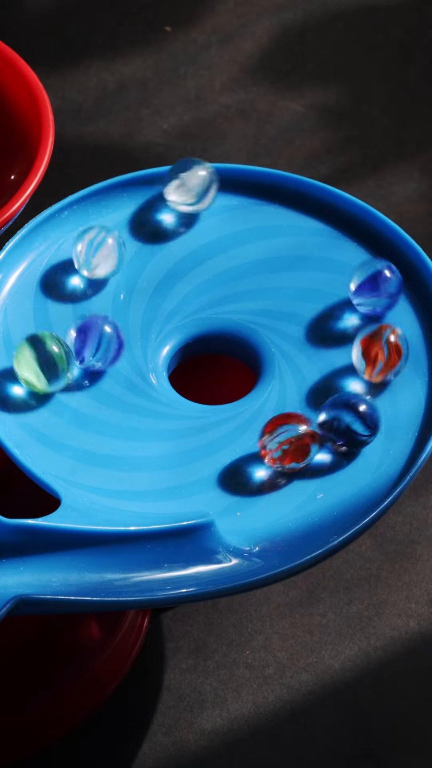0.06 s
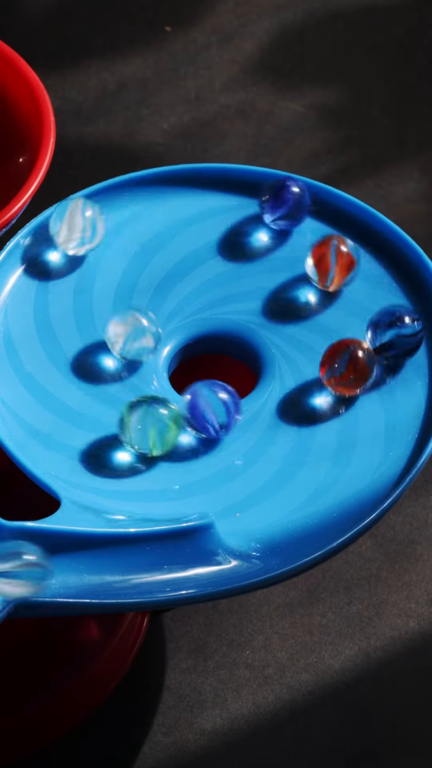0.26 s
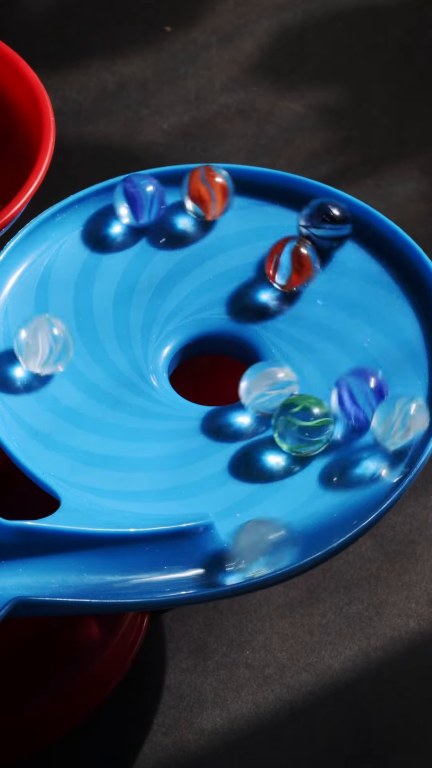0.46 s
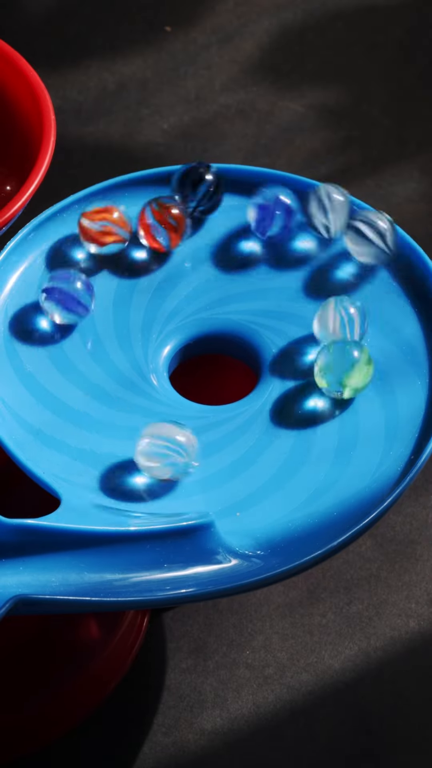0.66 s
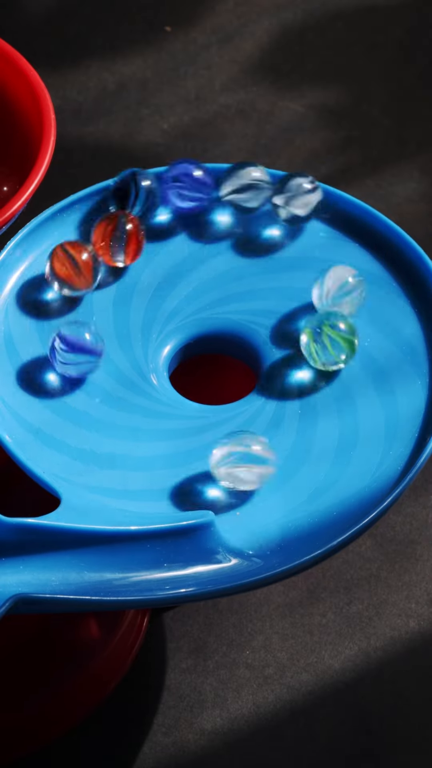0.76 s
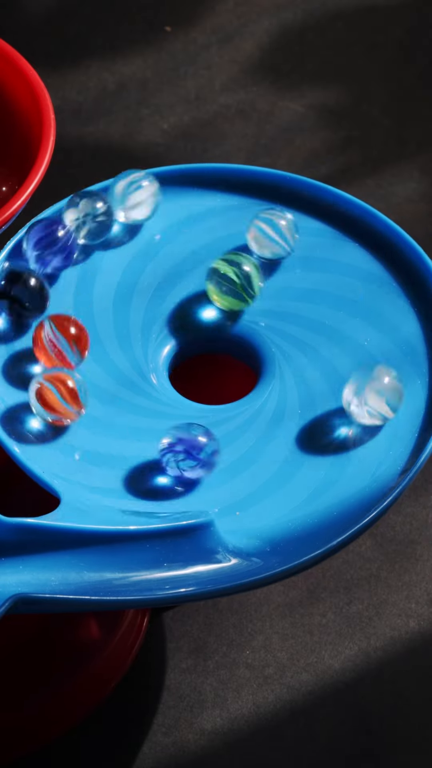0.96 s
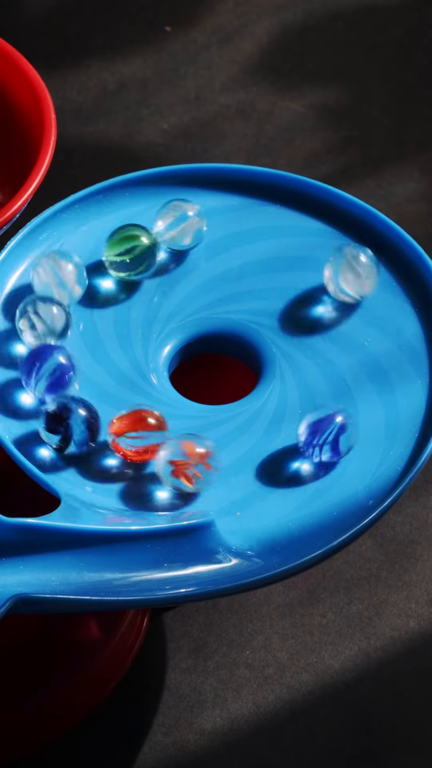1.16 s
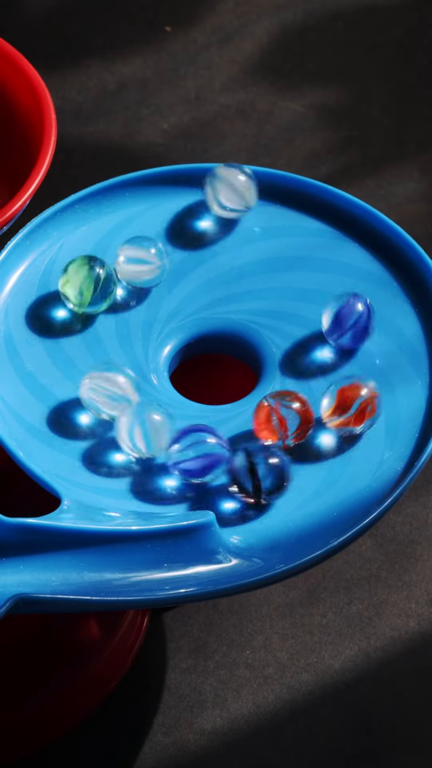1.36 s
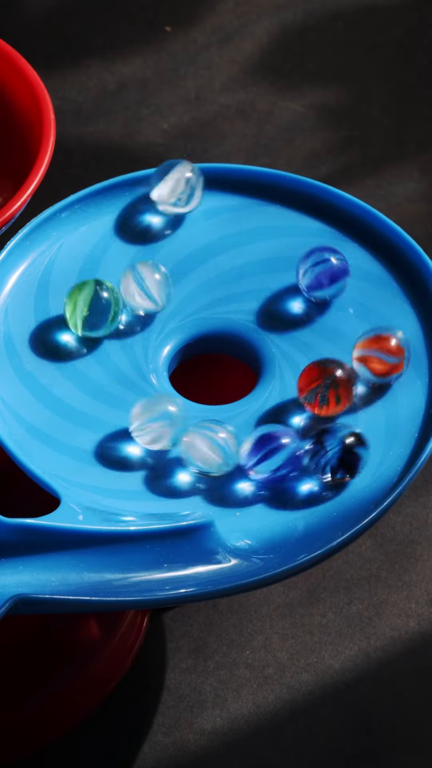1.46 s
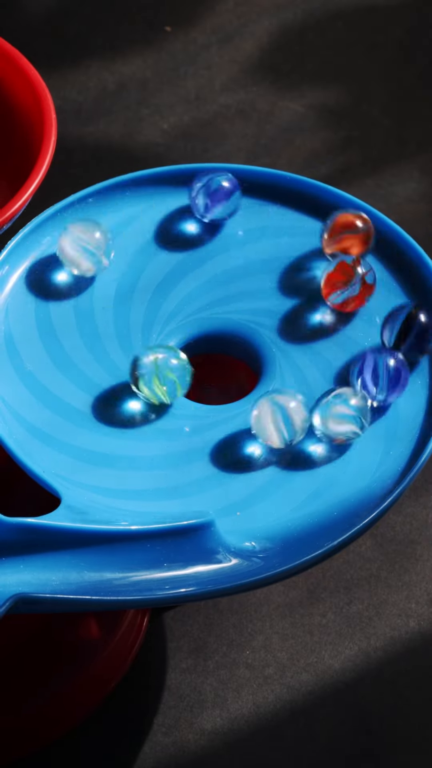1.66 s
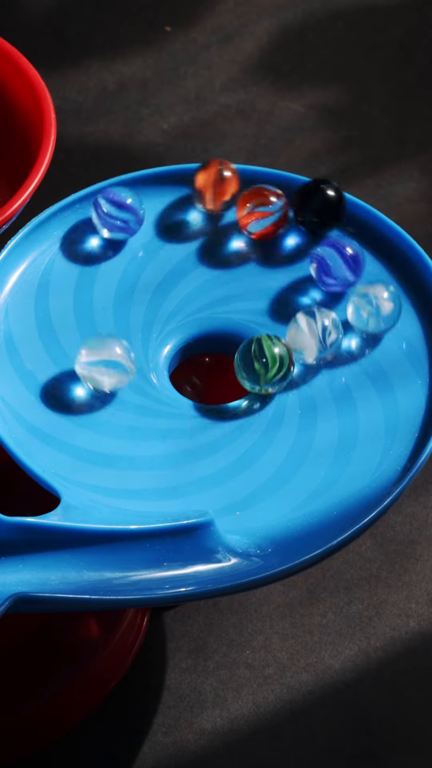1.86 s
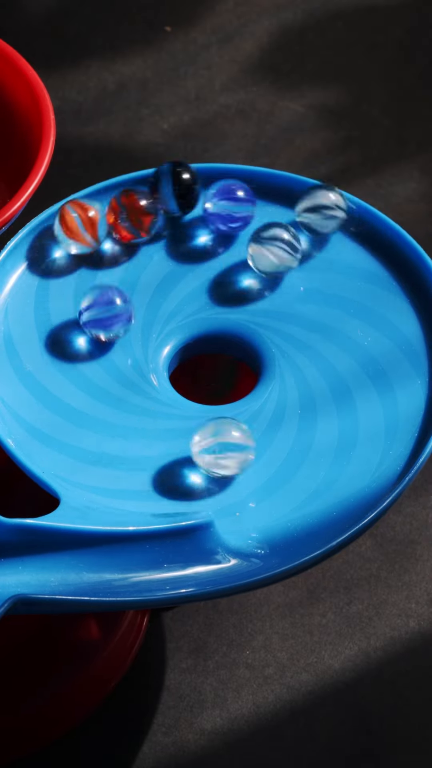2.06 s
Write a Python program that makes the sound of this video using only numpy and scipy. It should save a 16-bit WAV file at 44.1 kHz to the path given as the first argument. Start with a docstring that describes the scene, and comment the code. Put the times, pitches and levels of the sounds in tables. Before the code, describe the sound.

Glass marbles roll around a plastic funnel with a soft rumble, clicks and knocks.

```python
"""Glass marbles rumble, knock and click as a dozen of them circle in a plastic funnel, close by.
Tiny bumps under the rolling marbles shake the shell. Now and then one knocks on the plastic,
two click together, or one drops against the narrow neck with a hollow clack.
A hard surface nearby returns each hit a few milliseconds later, in a small, dry room."""
import sys
import numpy as np
from scipy import signal
from scipy.fft import rfft, irfft, next_fast_len
from scipy.io import wavfile
from scipy.ndimage import map_coordinates

SR = 44100
rng = np.random.default_rng(int(sys.argv[2]) if len(sys.argv) > 2 else 0)


def store_wav(level_fs):
    """Save 16-bit WAV to argv[1]."""
    pcm = np.round(np.clip(np.atleast_2d(level_fs), -1, 1) * 32767)
    wavfile.write(sys.argv[1], SR, pcm.T.astype(np.int16))


N = 92610


def amp(db):
    """Turns decibels into a number to multiply by."""
    return 10 ** (np.asarray(db) / 20)


def unit(x):
    """Scales a sound to an average (rms) level of 1."""
    return x / np.sqrt(np.mean(x ** 2) + 1e-20)


def along(points, hz):
    """Reads between (Hz, value) points, with octaves evenly spaced."""
    freqs, values = np.transpose(points)
    return np.interp(np.log(hz + 1), np.log(freqs + 1), values)


def over_time(points):
    """Joins (seconds, value) points into one value per sample."""
    return np.interp(np.arange(N) / SR, *np.transpose(points))


def filtered(x, response):
    """Multiplies each frequency in x by response(hz)."""
    size = next_fast_len(N + SR // 2)
    return irfft(rfft(x, size) * response(np.fft.rfftfreq(size, 1 / SR)), size)[:N]


def coloured(x, points):
    """Gives x the tone colour of (Hz, dB) points, using a pulse that peaks at 1."""
    size = 4096
    cepstrum = irfft(np.log(amp(along(points, np.fft.rfftfreq(size, 1 / SR)))))
    cepstrum[1:size // 2] *= 2  # folded forward, so nothing sounds before a hit
    cepstrum[size // 2 + 1:] = 0
    pulse = irfft(np.exp(rfft(cepstrum)))
    return signal.fftconvolve(x, pulse / np.abs(pulse).max())[:N]


def softened(x, hz):
    """Turns down the treble above hz: the softer the contact, the duller."""
    return signal.lfilter(*signal.butter(2, min(hz, .45 * SR), fs=SR), x)


def add(track, start_s, sound):
    """Mixes a sound into the track at start_s."""
    part = track[max(0, round(start_s * SR)):][:len(sound)]
    part += sound[:len(part)]


def contact(fade_s, tail_db):
    """A sharp pulse, then a dense shudder that dies away by 60 dB in fade_s."""
    t = np.arange(SR // 20) / SR
    rise = 1 - np.exp(-t / .0002)
    tail = rng.standard_normal(len(t)) * amp(-60 * t / fade_s) * rise
    return (t == 0) + amp(tail_db) * tail / np.linalg.norm(tail)


def ringing(x, tones):
    """x sets tones ringing; neighbouring tones swing in opposite directions."""
    def response(hz):
        return sum((-1) ** k * amp(db) * 1j * hz * width / (pitch ** 2 - hz ** 2 + 1j * hz * width)
                   for k, (pitch, width, db) in enumerate(tones))
    return filtered(x, response)


def hush():
    """The quiet, steady noise of the room."""
    # Each row: frequency in Hz, relative level in dB.
    colour = [(25, -22), (55, -17), (80, 2), (105, -12), (150, -1.5), (300, 0), (1000, 6), (6000, -29.5),
              (12000, -30), (16000, -45.5)]
    return amp(-79) * unit(coloured(rng.standard_normal(N), colour))


def room(x):
    """The room's short wash of echoes, a little different as the marbles move."""
    # Each row: frequency in Hz, seconds to fade by 60 dB.
    fade_times = [(200, 0.64), (1000, 0.19), (2800, 0.079), (7500, 0.11), (15000, 0.088)]
    wash, block = np.zeros(N), 4096
    for start in range(0, N, block):
        hz, t, noise = signal.stft(rng.standard_normal(SR // 3), SR, nperseg=256)
        fade = amp(-60 * t / along(fade_times, hz)[:, None])
        tail = signal.istft(noise * fade, SR, nperseg=256)[1]
        tail /= np.linalg.norm(tail)
        add(wash, start / SR + .003, signal.fftconvolve(x[start:start + block], tail))
    return wash


def near_echo(hits):
    """A hard surface nearby returns each hit, quieter and duller."""
    echo = np.zeros(N)
    add(echo, start_s=.0053, sound=amp(-16) * softened(hits, hz=6000))
    return echo


def funnel(x):
    """The plastic shell rings at its own tones when shaken."""
    # Each row: pitch in Hz, width in Hz, gain in dB.
    shell_tones = [(591, 82, 0.5), (950, 57, 5.5), (1048, 80, -9), (1243, 66, 5.5), (1370, 45, -13),
                   (1594, 14, 3.5), (1782, 20, -16), (2096, 53, 2.5), (2536, 40, -6), (2678, 39, 6),
                   (3150, 27, -15), (3283, 110, 5.5), (3476, 110, -3.5), (4340, 300, -10.5)]
    return ringing(x, shell_tones)


def rolling(roll_db):
    """Countless small bumps under the marbles shake the shell."""
    # The rumble's tone. Each row: frequency in Hz, relative level in dB.
    colour = [(30, -59.5), (130, -39.5), (400, -15), (740, -19), (960, -0.5), (1600, 1.5), (2700, -3),
              (3700, -12.5), (5200, -13), (7000, -27.5), (11000, -36.5), (16000, -55)]
    # Each row: time in seconds, dB added above split_hz and taken away below it.
    brightness = [(1.1, -0.5), (1.5, 2), (1.85, -1.5)]
    bumps_per_s, spread_db, split_hz = 2500, 4.5, 1660
    sway_db, sways_per_s = 1.2, 60  # the level wavers at random
    bumps = (rng.random(N) < bumps_per_s / SR) * rng.choice([-1, 1], N)
    sizes = amp(spread_db * np.minimum(rng.exponential(size=N), 4))
    sway = map_coordinates(rng.standard_normal(N // 20), [np.arange(N) * sways_per_s / SR])
    shake = coloured(bumps * sizes * amp(sway_db * sway), colour)
    rumble = unit(amp(-.5) * unit(funnel(shake)) + unit(shake))
    treble = filtered(rumble, lambda hz: hz ** 4 / (hz ** 4 + split_hz ** 4))
    tilt_db = over_time(brightness)
    return amp(roll_db) * (amp(tilt_db) * treble + amp(-tilt_db) * (rumble - treble))


def clicks(roll_db):
    """Marbles meet: bright ticks trail off in a fine rattle, with faint grazes in between."""
    # Glass on glass. Each row: start in seconds, relative level in dB, brightness in Hz.
    meetings = [(.0216, -40, 12000), (0.0363, -43, 11900), (0.0499, -34.5, 13300), (0.0902, -46, 14200),
                (.1413, -50, 12000), (.2348, -25, 14100), (.2624, -28, 16800), (0.2674, -29.5, 17000),
                (0.2898, -35, 14100), (0.3105, -26, 16000), (0.34, -44, 16900), (0.3468, -32.5, 17000),
                (0.385, -37.5, 14000), (0.5507, -43, 13000), (0.5583, -19, 13700), (0.595, -32, 11900),
                (.652, -46.5, 12000), (0.6919, -30, 12100), (0.7546, -22.5, 14600), (0.7875, -47, 14000),
                (0.8116, -26.5, 15000), (0.8148, -25, 14900), (0.822, -32, 14000), (0.827, -28, 13900),
                (0.8306, -28.5, 15100), (0.846, -35, 12000), (0.8536, -49, 12000), (.8697, -43, 11900),
                (1.1581, -40.5, 12800), (1.1823, -46.5, 14000), (1.263, -44, 14000), (1.3005, -36.5, 10000),
                (1.3240, -45, 11900), (1.35, -44, 10000), (1.3543, -48, 14000), (1.3615, -40, 13900),
                (1.4011, -39, 14000), (1.4267, -48, 12900), (1.483, -59.5, 10000), (1.515, -50, 10000),
                (1.5746, -51.5, 10900), (1.885, -48.5, 6900), (1.9355, -36, 12000), (1.947, -36.5, 15000),
                (1.9629, -38, 11900), (2.0842, -33.5, 11800)]
    # A tick's tone. Each row: frequency in Hz, relative level in dB.
    colour = [(100, -34.5), (600, -27.5), (1500, -12), (4000, -2.5), (6000, 1.5), (9000, 2.5),
              (12000, -2.5), (16000, -4.5)]
    rattle_s, grazes_per_s = .036, 62
    blows = np.zeros(N)

    def touch(start_s, db, bright_hz):
        add(blows, start_s, amp(db) * softened(contact(fade_s=.0026, tail_db=-1), bright_hz))

    for start_s, db, bright_hz in meetings:
        touch(start_s, db + 1.5, bright_hz)
        for delay in rng.random(3) * rattle_s:
            touch(start_s + delay, db - 19.5, bright_hz)
    grazing = rng.random(N) < grazes_per_s / SR
    grazes = grazing * amp(roll_db - 11 + 4.5 * rng.standard_normal(N))
    ticks = coloured(blows + softened(grazes, hz=10000), colour)
    return ticks + amp(-7.5) * funnel(ticks)


def knocks(strikes, colour, gain_db, shudder_s):
    """Marbles strike the plastic: a crack, a shudder and the shell's ring."""
    blows = np.zeros(N)
    for start_s, db, bright_hz, shudder_db in strikes:
        add(blows, start_s, amp(db + gain_db) * softened(contact(shudder_s, shudder_db), bright_hz))
    crack = coloured(blows, colour)
    return crack + amp(-8.5) * funnel(crack)


def neck_knocks():
    """A marble drops against the narrow neck: a dry clack over a low, hollow ring."""
    # Each row: start in seconds, relative level in dB, brightness in Hz, shudder in dB.
    strikes = [(1.7464, -19, 11300, 8.4), (1.8011, -33, 3450, 9.5), (2.0365, -41, 2020, 10)]
    # The clack's deeper tone. Each row: frequency in Hz, relative level in dB.
    colour = [(30, -54), (200, -43), (500, -18), (700, -0.5), (1100, -1), (2700, 1.5), (4900, 0.5),
              (5700, -8), (7800, -11.5), (9800, -22), (16000, -24.5)]
    # The hollow ring. Each row: pitch in Hz, width in Hz, gain in dB.
    neck_tones = [(486, 19, 5), (724, 8.7, 2), (842, 18, -3.5)]
    clack = knocks(strikes, colour, gain_db=2, shudder_s=.0055)
    return clack + ringing(clack, neck_tones)


def bowl_knocks():
    """Marbles knock on the wide bowl, which shudders longer than the neck."""
    # Each row: start in seconds, relative level in dB, brightness in Hz, shudder in dB.
    strikes = [(0.0257, -36.5, 4960, -14), (0.0504, -39.5, 6000, 11.5), (0.2347, -19.5, 3500, 0.5),
               (0.2623, -12.5, 9700, -4.5), (.2678, -20, 6960, -1.5), (.2865, -31, 6000, 3),
               (.2902, -25, 5000, 1), (.3106, -18.5, 6000, 2), (0.3396, -9.5, 11700, -14),
               (.3448, -20, 4000, 2.5), (.3637, -30, 6000, 7), (.3670, -18, 3000, -11),
               (0.3843, -32.5, 6940, 11), (.529, -38, 4000, 2), (.5612, -32, 4060, 11.5),
               (0.5915, -27, 4160, 8), (.652, -38.5, 4530, 4.5), (0.6585, -39, 3000, 7),
               (.6998, -38, 2980, 1), (0.7575, -36, 4000, 7), (.8165, -26.5, 4040, 4.5),
               (0.8389, -33.5, 4000, 9.5), (0.8454, -38, 4000, 5), (0.8613, -42, 4990, 4),
               (.9405, -44.5, 4900, 6), (.9845, -42.5, 4920, 1.5), (1.023, -40.5, 4070, -1.5),
               (1.3, -40.5, 3020, 0.5), (1.383, -46.5, 4970, 1), (1.48, -45.5, 5000, 4),
               (1.8167, -38, 9000, 9), (1.8205, -37, 6000, 2.5), (1.8258, -36, 6000, 5.5),
               (1.897, -49.5, 4970, 12.5), (1.9815, -41, 4000, 11), (2.0855, -32.5, 4000, 7.5)]
    # A knock's tone. Each row: frequency in Hz, relative level in dB.
    colour = [(30, -59), (150, -34), (420, -19.5), (720, -11.5), (920, -0.5), (1800, 0), (2700, 2),
              (4600, -5), (6200, -9.5), (7800, -11), (9800, -21), (11700, -3), (13200, -7), (15000, -4.5),
              (16500, -12.5)]
    return knocks(strikes, colour, gain_db=5.5, shudder_s=.02)


def scene():
    """Mixes the hits, the hush, the echoes and the rolling into one channel."""
    # How hard the marbles roll. Each row: time in seconds, level in dB.
    roll_levels = [(0, -56.5), (.09, -60.5), (.12, -55), (0.169, -60), (.26, -55), (0.287, -38.5),
                   (0.326, -54), (0.359, -45), (.42, -51.5), (.53, -51.5), (.645, -49.5), (.68, -46),
                   (0.739, -52), (.8, -50), (.83, -48), (.89, -55.5), (1.2, -59.5), (1.519, -57),
                   (1.692, -64.5), (1.8, -51.5), (1.94, -60), (2.1, -53)]
    roll_db = over_time(roll_levels)
    hits = bowl_knocks() + neck_knocks() + clicks(roll_db)
    background = hush() + amp(-11) * room(softened(hits, hz=8000)) + near_echo(hits)
    return (background + rolling(roll_db) + hits)[None]


def record(dry):
    """Cuts off the very highest treble steeply."""
    top_hz, slope_width_hz = 16600, 800
    return filtered(dry[0], lambda hz: np.clip((top_hz - hz) / slope_width_hz + .5, 0, 1))[None]


dry = scene()
out = record(dry)
store_wav(out)
```